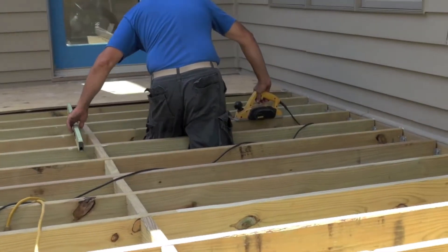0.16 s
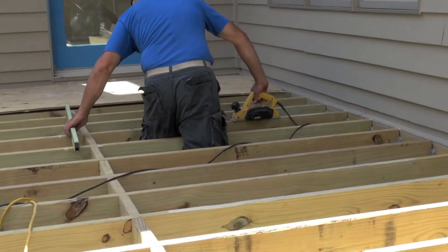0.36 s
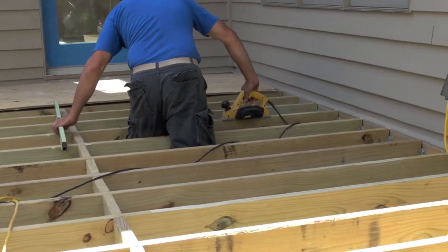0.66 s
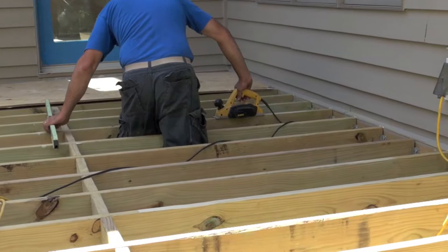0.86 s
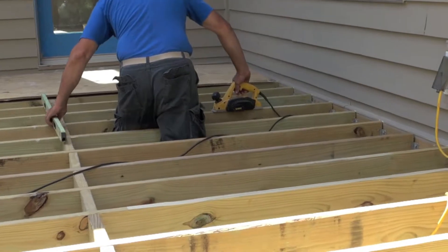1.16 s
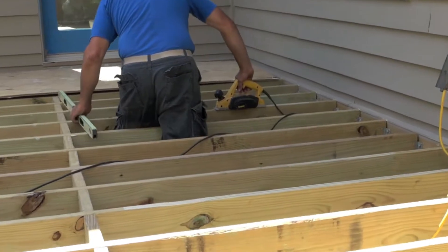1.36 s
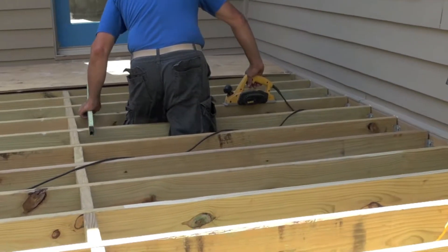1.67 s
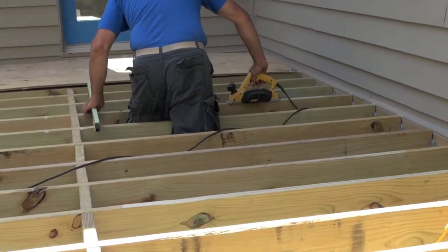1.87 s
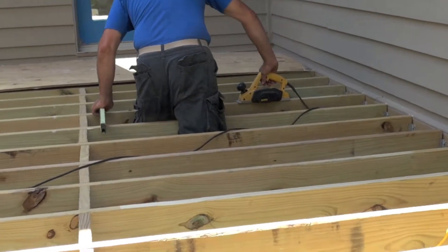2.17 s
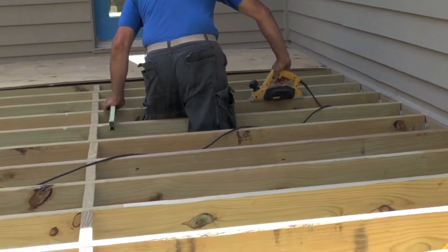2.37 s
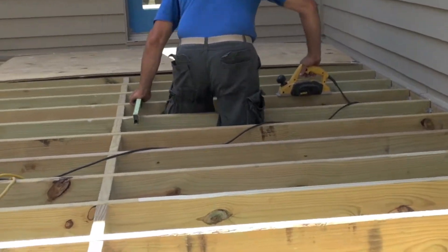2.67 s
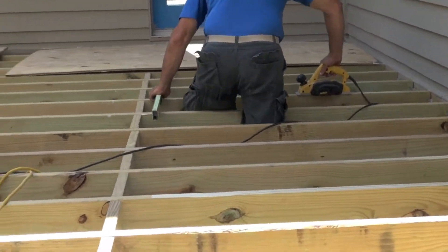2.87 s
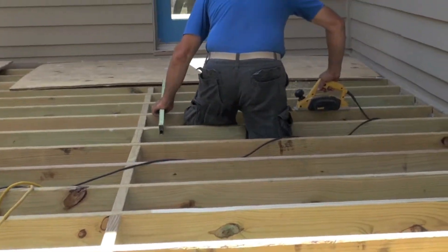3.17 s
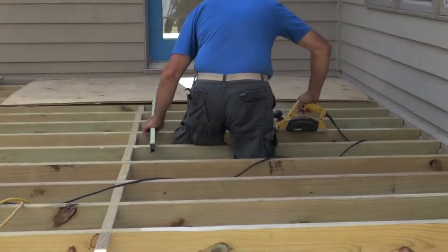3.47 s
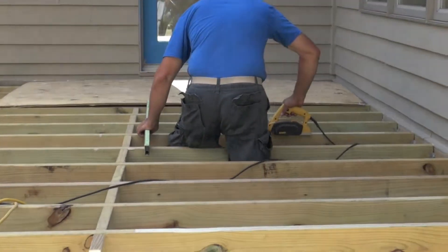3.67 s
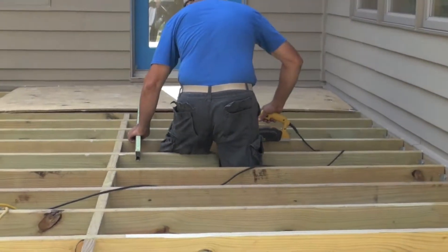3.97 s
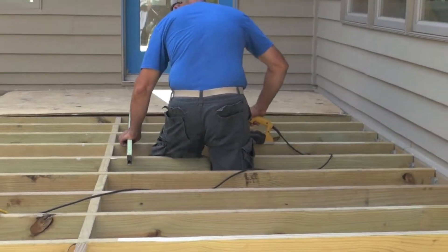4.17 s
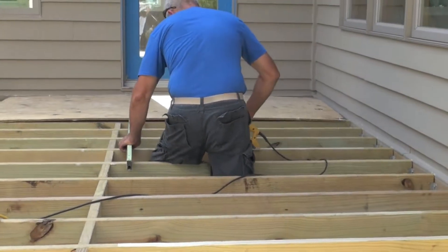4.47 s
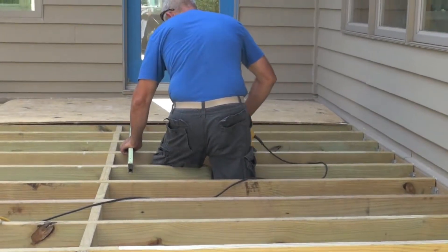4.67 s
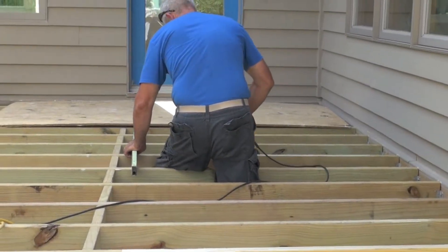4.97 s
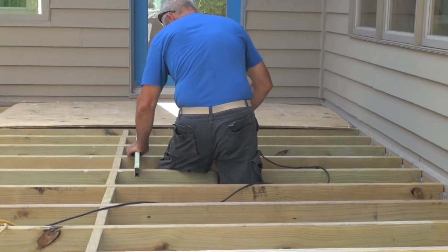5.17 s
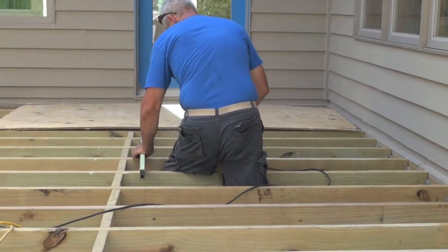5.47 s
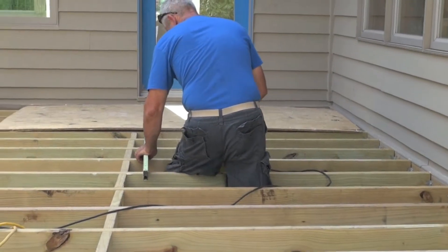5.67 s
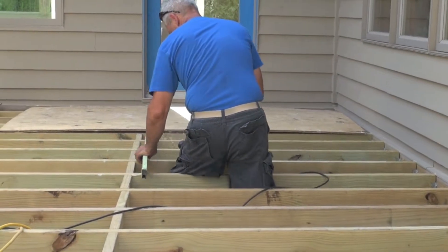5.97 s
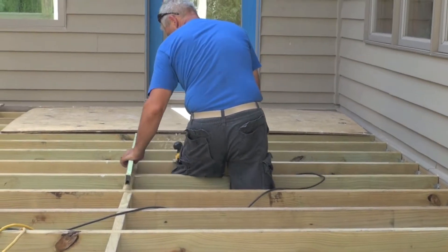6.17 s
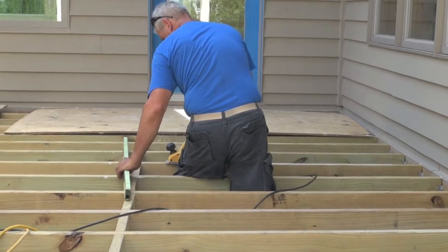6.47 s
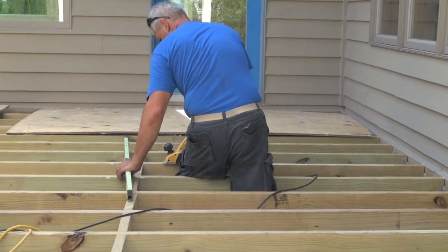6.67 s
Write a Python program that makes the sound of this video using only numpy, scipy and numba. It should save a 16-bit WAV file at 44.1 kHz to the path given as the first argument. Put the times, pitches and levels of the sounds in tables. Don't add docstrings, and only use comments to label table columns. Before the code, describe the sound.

Wood and metal knocks and scrapes on deck joists outdoors, then an electric hand planer whines up and roars, sagging as it cuts timber.

```python
import sys
import numpy as np
from scipy import signal
from scipy.fft import rfft, irfft, next_fast_len
from scipy.io import wavfile
from scipy.ndimage import uniform_filter1d, map_coordinates
from numba import njit

SR = 44100
rng = np.random.default_rng(int(sys.argv[2]) if len(sys.argv) > 2 else 0)


def unload_wav(signal):
    wavfile.write(
        sys.argv[1],
        SR,
        np.round(np.clip(np.atleast_2d(signal).T, -1, 1) * 32767).astype(np.int16),
    )


def decibels_to_gain(level_db):
    exponent = np.asarray(level_db, float) / 20
    return 10 ** exponent


N = 300762
START = 118000
STEP = 64


def level(x, db):
    return x * decibels_to_gain(db) / np.sqrt(np.mean(x ** 2))


def butter(x, order, hz, kind="low"):
    return signal.sosfilt(signal.butter(order, hz, kind, fs=SR, output="sos"), x)


def curves(table, count):
    s, *columns = np.transpose(table)
    return [np.interp(np.arange(count, N) / SR, s, c) for c in columns]


def on_log(table, hz):
    table = np.array(table)
    return np.interp(np.log(np.maximum(hz, 1)), np.log(table[:, 0]), table[:, 1])


def walk(rate, size, step=1):
    knots = rng.standard_normal(1024)
    grid = np.arange(0, size + 2 * STEP, STEP)
    smooth = map_coordinates(knots, [grid * rate / SR], order=3, mode="mirror")
    return np.interp(np.arange(0, size + step - 1, step), grid, smooth)


def pair(mid, side):
    return np.array([mid + side, mid - side])


def patchy(colour, spread, size, slow_db, quick_db, quick_rate):
    n = next_fast_len(size)
    hz = np.fft.rfftfreq(n, 1 / SR)
    mid, side = rfft(rng.standard_normal((2, n))) * decibels_to_gain(on_log(colour, hz))
    side = side * decibels_to_gain(on_log(spread, hz))
    out = np.zeros((2, size))
    for centre in np.arange(4.5, 14.5, .5):
        share = np.clip(1 - 2 * np.abs(np.log2(np.maximum(hz, 1)) - centre), 0, 1)
        band = irfft(np.array([mid, side]) * share, n)[:, :size]
        out += band * decibels_to_gain(slow_db * walk(1.98, size) + quick_db * walk(quick_rate, size))
    return pair(*out)


# [Hz, dB per Hz]
YARD_COLOUR = [(25, -16), (50, -9), (85, -6), (120, 3), (170, -7), (310, -4.5), (420, -9.5), (1000, -14.5),
               (2500, -24), (4000, -22.5), (6300, -23.5), (8000, -26), (10000, -35), (13300, -37.5),
               (14500, -67)]


def yard():
    spread = [(60, -75.0), (300, -26.0), (1000, -4.0), (8000, -7.0), (10500, -1.0), (11300, -55.0)]  # Hz, dB
    murmur = patchy(YARD_COLOUR, spread, N, slow_db=.2, quick_db=.6, quick_rate=5.7)
    duck_db = np.interp(np.arange(N) / SR, [1.0, 2.6, 2.94, 3.0], [-0.5, 0.5, 2.5, -7.5])
    return level(murmur, -37.5) * decibels_to_gain(duck_db)


def ring(x, modes):
    out = 0
    for hz, width_hz, db in modes:
        b, a = signal.iirpeak(hz, hz / max(width_hz, 5), SR)
        out = out + decibels_to_gain(db) * signal.lfilter(b, a, x)
    return out


# [s, dB, dB, s, Hz]
LEVEL_KNOCKS = [(0.009, -27, -17, 0.083, 332), (0.148, -22.5, -6.5, 0.32, 860),
                (0.19, -23.5, -26, 0.28, 363), (0.772, -27, -17, 0.33, 294), (0.857, -24.5, -31, 0.26, 303),
                (0.982, -16.5, -23, 0.21, 607), (1.024, -21, -13, 0.066, 627), (1.082, -30, -16, 0.12, 350),
                (1.409, -25, -2.5, 0.089, 814), (1.422, -26.5, -8, 0.26, 278),
                (1.501, -28.5, -25, 0.35, 233), (1.61, -15, -6.5, 0.19, 366), (1.629, -18, -24, 0.1, 376),
                (1.663, -20.5, -11, 0.19, 345), (1.895, -20.5, -14, 0.15, 1110),
                (1.921, -22, -25, 0.084, 640)]
# [s, dB, dB, s, Hz]
TOOL_KNOCKS = [(2.005, -25.5, -5, 0.51, 412), (2.042, -12, -11.5, 0.22, 690), (2.065, -20.5, -8, 0.38, 556),
               (2.132, -18.5, -32, 0.13, 970), (2.178, -26.5, -40, 0.18, 294),
               (2.251, -22, -35, 0.049, 285), (2.282, -24.5, -30, 0.34, 696), (2.383, -11, -9.5, 0.28, 670),
               (2.429, -16, -10, 0.27, 740), (2.499, -25, -14, 0.42, 420), (2.599, -27, -8, 0.14, 413),
               (2.683, -24.5, -11, 0.17, 1100), (2.74, -19.5, -3, 0.22, 840), (2.769, -22, -23, 0.44, 654),
               (2.959, -25, -5, 0.71, 282.5)]
# [Hz, Hz, dB]
TIMBER_MODES = [(290, 40, 10), (395, 10.4, 11.5), (610, 162, 3.5), (965, 38, -5), (1134, 36, -6),
                (1480, 51, -33)]
# [Hz, Hz, dB]
METAL_MODES = [(2320, 45, -1), (2896, 39, 9.5), (2970, 18, -24), (4430, 75, 0.5), (5100, 55, -0.5),
               (5580, 75, 1)]


def knocks():
    board, low, high = np.zeros((3, 2, N + SR))
    t = np.arange(SR // 2) / SR
    level_pan_db, tool_pan_db = -0.1, -1.6
    blows = [(*row, level_pan_db) for row in LEVEL_KNOCKS] + [(*row, tool_pan_db) for row in TOOL_KNOCKS]
    for s, db, bright_db, fade_s, board_hz, pan_db in blows:
        attack_s = 0.00026 * decibels_to_gain(-db - 5.0)
        scrape = np.exp(-np.log(1000) * t / max(fade_s, .02))
        crack = .25 * np.exp(-t / 0.00078)
        shape = (1 - np.exp(-t / attack_s)) * (scrape + crack)
        grit = rng.standard_normal((3, len(t)))
        chatter = decibels_to_gain(10 * uniform_filter1d(grit[2], size=60))
        rattle = shape * chatter * pair(grit[0], 0.089 * grit[1])
        rattle = rattle * decibels_to_gain(db + np.array([[pan_db], [-pan_db]]) / 2)
        i = int(s * SR)
        board[:, i:i + len(t)] += ring(rattle, [(board_hz, 11.0 + 0.036 * board_hz, 0)])
        low[:, i:i + len(t)] += rattle
        high[:, i:i + len(t)] += rattle * decibels_to_gain(bright_db)
    thud = butter(low, 1, [200, 1400], "band")
    clack = butter(high, 3, [1500, 7000], "band")
    wood = decibels_to_gain(14.0) * board + decibels_to_gain(5.0) * ring(low, TIMBER_MODES) + decibels_to_gain(-5.5) * thud
    metal = decibels_to_gain(5.5) * ring(high, METAL_MODES)
    blend = wood + metal + decibels_to_gain(-6.0) * clack
    return butter(blend[:, :N], 2, 7500)


def deck(x):
    t60_s, echo_db = 0.096, -14
    t = np.arange(SR // 2) / SR
    tail = rng.standard_normal((2, len(t))) * np.exp(-np.log(1000) * t / t60_s) * (t > .008)
    tail = signal.lfilter([1], [1, -.6], tail)
    tail = tail / np.sqrt(np.sum(tail ** 2) / 2)
    return signal.fftconvolve(x, tail, axes=1)[:, :N] * decibels_to_gain(echo_db)


def tilt_above(x, hz, db):
    return butter(x, 2, hz) - butter(x, 2, hz, "high") * decibels_to_gain(db)


# [Hz, dB per Hz]
CHIP_COLOUR = [(40, -94), (90, -16.5), (150, -17.5), (221, -14), (290, -8), (480, -15), (620, -8),
               (1000, -12), (1490, -7.5), (2400, -8.5), (4550, -13), (7070, -12.5), (9800, -22.5),
               (11800, -18), (13400, -29), (15700, -33.5)]
# [Hz, dB]
SPREAD = [(60, -24), (200, -16.5), (380, -10), (700, -6), (1290, -5), (2380, -9.5), (4400, -11.5),
          (8120, -12.5), (10500, -0.5), (11300, -23)]


def chip_noise(turn, chip_db, turned_db):
    chips = level(patchy(CHIP_COLOUR, SPREAD, len(turn), slow_db=0.0, quick_db=0.9, quick_rate=14.0), 0)
    pulse = 1 + 0.18 * np.cos(2 * turn) + 0.026 * np.cos(turn)
    return tilt_above(chips * pulse * decibels_to_gain(chip_db), 3960, turned_db + 6.0)


# [s, Hz]
SPIN_UP = [
    (2.7, 69.7),
    (2.8, 102.7),
    (2.89, 127.8),
    (2.97, 150.2),
    (3.04, 156.3),
    (3.2, 161.1),
    (3.34, 161.2),
    (3.44, 159.7),
    (3.56, 153),
]
# [s, Hz]
LOADED_SPEED = [(3.66, 151.3), (3.74, 148.7), (3.87, 150.2), (4.3, 151.7), (4.55, 148.2), (4.62, 149),
                (4.82, 143.6), (5.19, 143.6), (5.33, 136.9), (5.49, 131.8), (5.58, 133.2), (5.83, 140.8),
                (5.96, 140), (6.23, 143.7), (6.33, 147.4), (6.5, 146.1), (6.56, 144.2), (6.82, 140.2)]


def drum_turn():
    hz = curves(list(SPIN_UP) + list(LOADED_SPEED), count=START)[0]
    size = len(hz)
    wobble_hz = .35 * walk(16, size)
    bogged = np.clip((141 - hz) / 9, 0, 1) ** 2 * (np.arange(size) > np.argmax(hz))
    grain = .08 + .32 * bogged
    return hz, 2 * np.pi * np.cumsum(hz + wobble_hz) / SR + grain * 0.11 * walk(70.0, size)


@njit
def stack(turn, weight, step):
    out = np.zeros((2, len(turn)))
    for i in range(len(turn)):
        j, part = i // step, (i % step) / step
        z = np.exp(1j * turn[i])
        p = z
        for k in range(weight.shape[2]):
            for c in range(2):
                out[c, i] += (p * (weight[j, c, k] * (1 - part) + weight[j + 1, c, k] * part)).imag
            p *= z
    return out


# [-, dB]
LINE_BALANCE = [(1, -16), (2, -3.5), (3, -13), (4, 0.5), (5, -8), (6, -2.5), (7, -12.5), (8, 2.5), (9, -12),
                (10, -1), (11, -7.5), (12, -1.5), (13, -8), (14, 1), (15, -9.5), (16, 0.5), (17, -7),
                (18, -3.5), (19, -6), (20, -7.5), (21, -5.5), (22, -11.5)]
SWELLS = {1: [(3.08, 0.088, -35.5), (3.75, 0.29, -37), (4.35, 0.18, -36), (6.2, 0.13, -37)],
          2: [(3.02, 0.057, -29.5), (4.65, 0.18, -33.5), (5.75, 0.72, -29.5), (6.5, 0.12, -20)],
          4: [(3.08, 0.048, -24), (4.15, 0.56, -24.5), (6.3, 0.035, -26.5), (6.5, 0.11, -27)],
          6: [(2.95, 0.15, -27.5), (3.4, 0.3, -28), (4.28, 0.11, -23), (5.3, 0.66, -24.5),
          (6.4, 0.57, -24)], 8: [(3.53, 0.072, -23.5), (3.95, .25, -24), (4.95, 0.29, -27.5),
          (6.78, 0.17, -21.5)], 10: [(3.4, 0.13, -26.5), (4.67, 0.15, -26), (6.5, 0.29, -21)],
          12: [(3.0, 0.11, -25), (3.3, 0.17, -24.5), (4.75, .08, -26), (6.5, 0.28, -24.5)],
          16: [(3.48, 0.062, -22.5), (4.4, 0.5, -25.5), (5.0, 0.27, -22.5), (6.0, 0.31, -22)]}
SINGS = {5: [(3.7, 0.19, -28.5), (5.72, 0.069, -25.5)], 10: [(5.66, 0.04, -25)], 12: [(5.66, 0.049, -26.5)],
         14: [(3.3, 0.16, -21.5), (3.59, 0.057, -23.5), (4.0, 0.18, -18.5), (4.42, 0.087, -26),
         (6.37, 0.043, -24.5)], 16: [(6.55, .15, -22)], 17: [(5.9, 0.15, -32)], 18: [(4.45, .15, -27),
         (5.25, 0.036, -22.5)], 20: [(4.53, 0.046, -23), (4.77, 0.056, -25), (6.48, 0.084, -26.5)],
         22: [(5.9, 0.039, -28), (6.45, 0.066, -35)], 24: [(5.12, 0.11, -24.5)], 26: [(3.1, 0.085, -27.5),
         (3.52, 0.14, -27), (5.12, 0.15, -27), (6.05, 0.047, -26)], 28: [(3.75, 0.16, -29),
         (4.62, 0.17, -24)], 30: [(4.2, 0.19, -30), (4.55, 0.18, -21.5)], 31: [(5.95, .13, -25.5)],
         32: [(3.07, 0.035, -22.5), (6.4, 0.075, -25)]}


def knives(hz, turn, cut_db, upper_db):
    slow = np.minimum(np.arange(0, len(hz) + 2 * STEP, STEP), len(hz) - 1)
    span = (len(slow) - 1) * STEP + 1
    cut_db, upper_db = cut_db[slow], upper_db[slow]

    def wander(rate):
        return walk(rate, span, STEP)[:len(slow)]

    weight = np.zeros((len(slow), 2, 64), complex)
    for k in range(1, 65):
        drift = wander(4.845)
        if k <= 16 and k % 2 == 0:
            db = LINE_BALANCE[k - 1][1] + cut_db - 13 + 1.3 * drift
        elif k <= len(LINE_BALANCE):
            db = LINE_BALANCE[k - 1][1] + cut_db - 9.5 + (k > 18) * 6.9 * upper_db + 2 * drift
        else:
            slope_db = -14.5 - 5.1 * (k % 2) - 0.011 * (k - len(LINE_BALANCE)) ** 2
            db = cut_db + 4.2 * upper_db + slope_db + 1.5 * drift
        sing_db = np.full(len(slow), -99.)
        for s, half, top_db in SWELLS.get(k, []) + SINGS.get(k, []):
            sing_db = np.maximum(sing_db, top_db - 6 * ((START + slow) / SR - s) ** 4 / half ** 4)
        flicker_db = 1.4 * wander(28.0)
        phase = 2 * np.pi * rng.random() + 0.35 * wander(3.02)
        share = .4 if k <= 16 else .8
        echo = np.sqrt(1 - share) + np.sqrt(share / 2) * (wander(11) + 1j * wander(11))
        singing = np.clip((sing_db - db) / 6 + 1, 0, 1)
        line = (1 - singing) * decibels_to_gain(db) * echo + singing * decibels_to_gain(np.maximum(db, sing_db))
        line = np.sqrt(2) * decibels_to_gain(flicker_db) * line * np.exp(1j * phase)
        lead = 1.11 * decibels_to_gain(on_log(SPREAD, k * hz.mean())) * wander(1.41)
        weight[:, :, k - 1] = (line * (1 + 1j * np.array([lead, -lead]))).T
    return stack(turn, weight, STEP)


# [s, Hz, dB]
WHINE = [
    (2.71, 1437, -46),
    (2.764, 1682, -19),
    (2.794, 2040, -29),
    (2.88, 2916, -26),
    (2.958, 3110, -40),
    (2.97, 2800, -42),
]


def motor_whine():
    hz, db = curves(WHINE, count=START)
    t = np.arange(START, N) / SR
    fade = np.interp(t, [2.69, 2.74, 2.8, 2.83, 2.97], [0, 1, 1, .4, .35], right=0)
    rough_db = 1.0 + 3.0 * walk(400.0, len(t))
    phase = 2 * np.pi * np.cumsum(hz) / SR + 2.2 * walk(260.0, len(t))
    return fade * decibels_to_gain(db + rough_db) * np.sin(phase)


# [s, dB, dB, dB]
CUT = [(2.68, -50, -52, -29), (2.76, -25.5, -37, -12), (2.84, -30, -28, -17), (2.94, -24, -27, -20),
       (2.97, -24.5, -19, 5), (3.17, -18, -17, -15), (3.24, -22, -19.5, -3.5), (3.62, -23, -17.5, 2),
       (4.3, -23, -17, -4), (4.5, -30, -17.5, 2), (4.8, -23, -18, -3), (5.12, -23.5, -18.5, -2.5),
       (5.33, -21.5, -16, 2.5), (5.58, -20.5, -19, -2), (5.66, -24, -16, -1), (6.3, -23, -18.5, -2),
       (6.6, -21.5, -17.5, -13), (6.82, -20.5, -16.5, -9.5)]


def planer():
    chip_db, cut_db, turned_db = curves(CUT, count=START)
    t = np.arange(START, N) / SR
    hz, turn = drum_turn()
    chips = chip_noise(turn, chip_db, turned_db)
    upper_db = 0.1 * np.clip(np.median(chip_db) - chip_db, -1, 6)
    lines = knives(hz, turn, cut_db, upper_db)
    bite = np.interp(t, [2.7, 2.85, 2.96], [0, .4, 1])
    pan_db = -1.67 + 0.054 * turned_db
    out = np.zeros((2, N))
    tool = bite * lines + (t > 2.684) * chips + motor_whine()
    out[:, START:] = tool * decibels_to_gain(np.array([pan_db, -pan_db]) / 2)
    return out


def scene():
    blows = knocks()
    return yard() + blows + deck(blows) + planer()


def top_cut(x):
    return signal.sosfilt(signal.butter(12, 15750, fs=SR, output="sos"), x)


def record(dry):
    side = butter(dry[0] - dry[1], 2, [130, 13000], "band") / 2
    mix = np.tanh(.5 * pair(dry.mean(axis=0), side)) / .5
    return top_cut(mix)


dry = scene()
out = record(dry)
unload_wav(out)
```